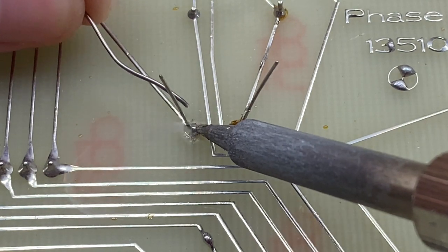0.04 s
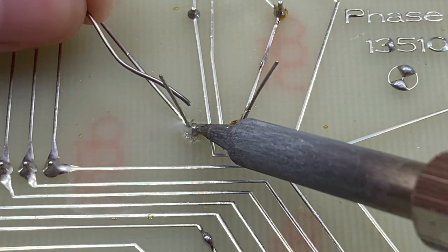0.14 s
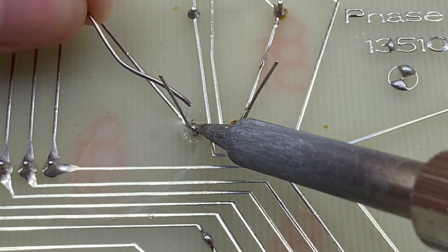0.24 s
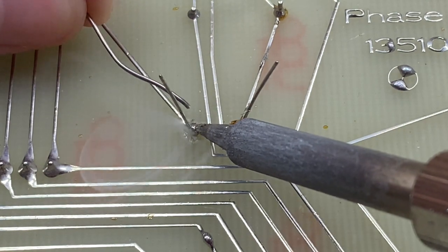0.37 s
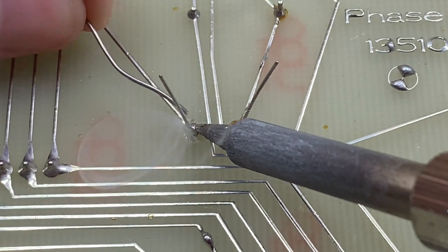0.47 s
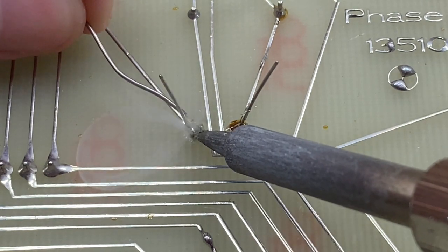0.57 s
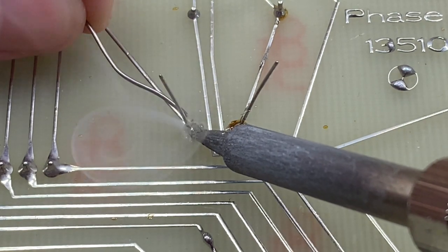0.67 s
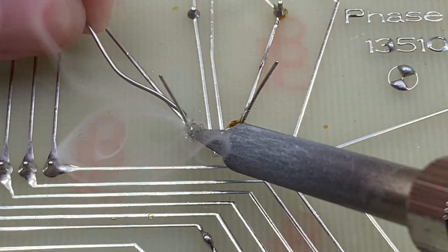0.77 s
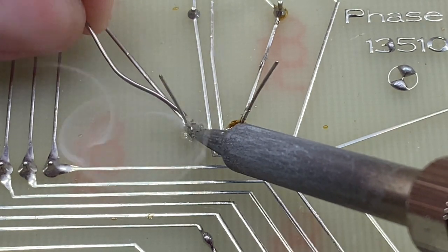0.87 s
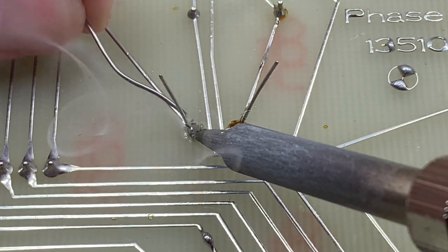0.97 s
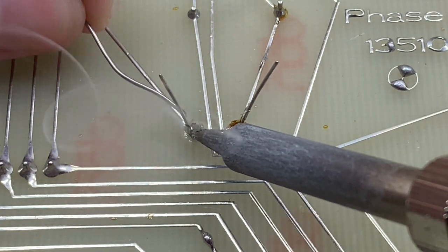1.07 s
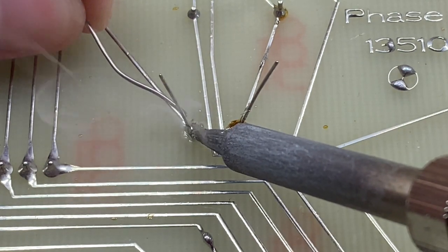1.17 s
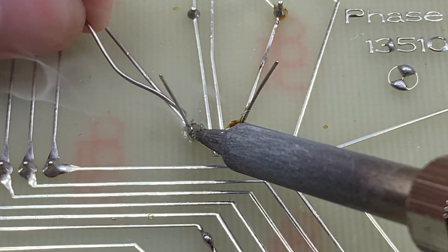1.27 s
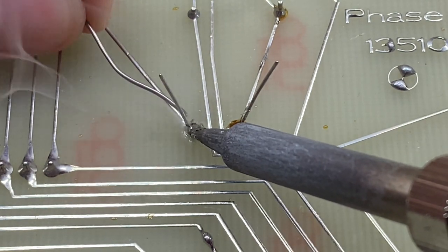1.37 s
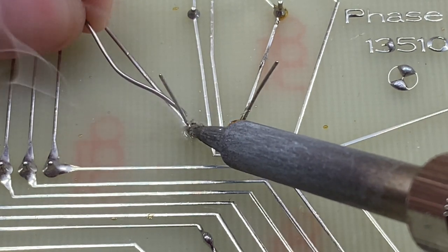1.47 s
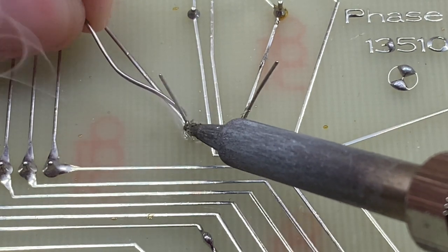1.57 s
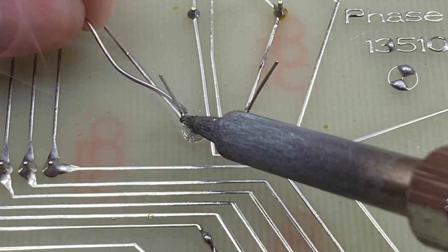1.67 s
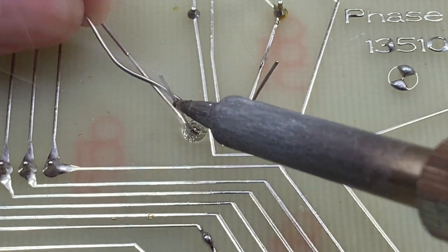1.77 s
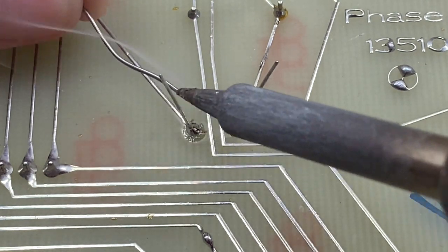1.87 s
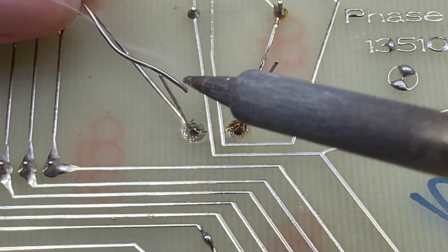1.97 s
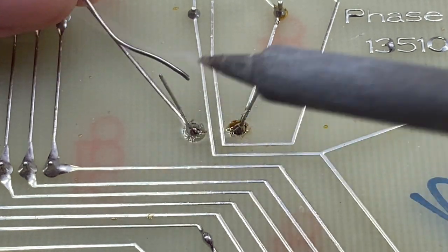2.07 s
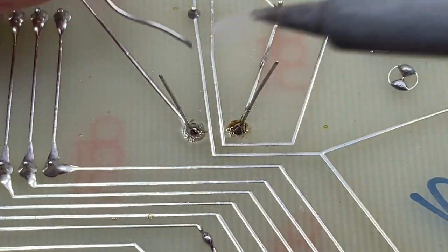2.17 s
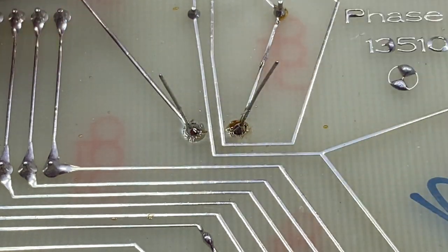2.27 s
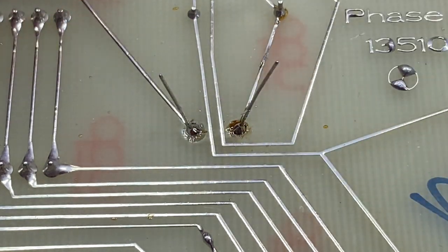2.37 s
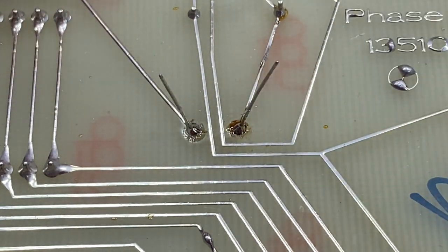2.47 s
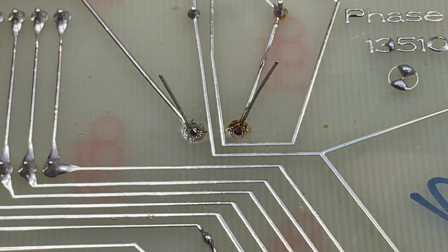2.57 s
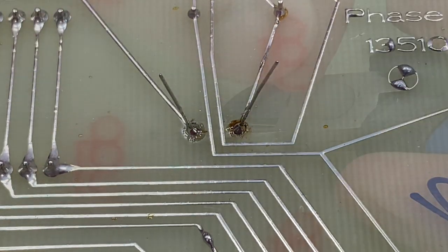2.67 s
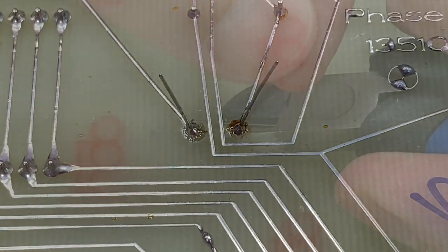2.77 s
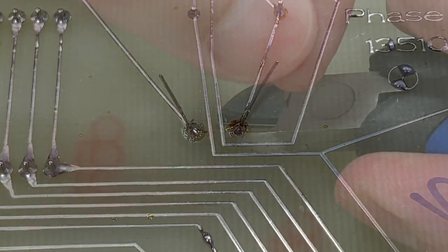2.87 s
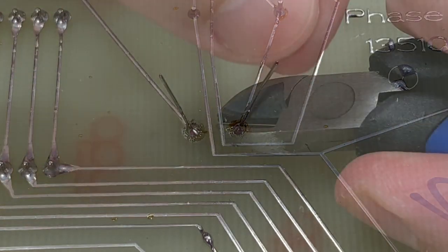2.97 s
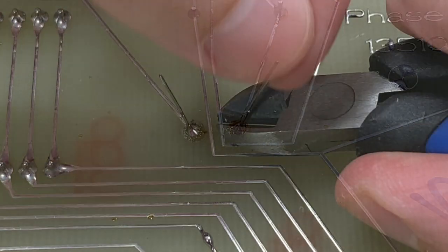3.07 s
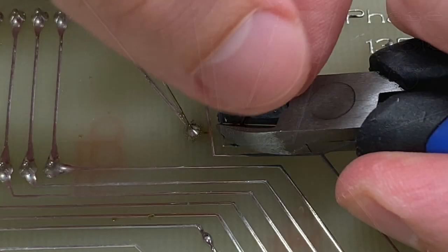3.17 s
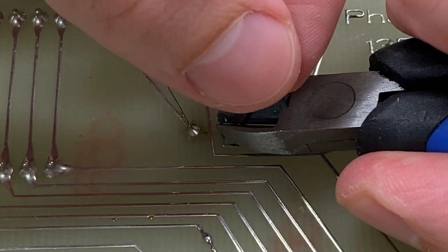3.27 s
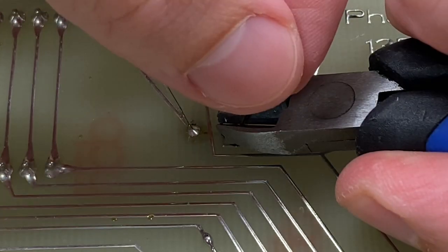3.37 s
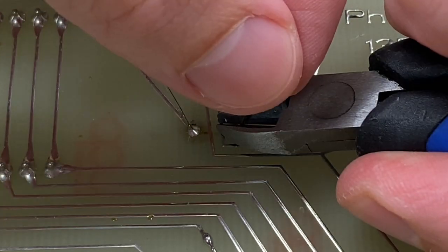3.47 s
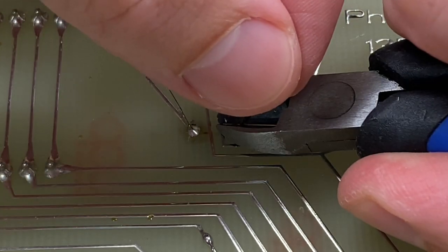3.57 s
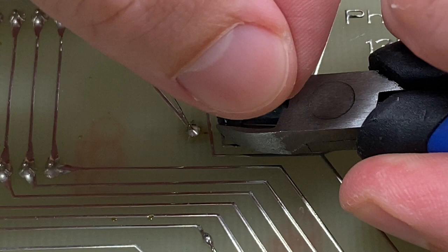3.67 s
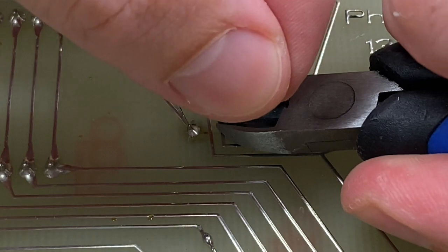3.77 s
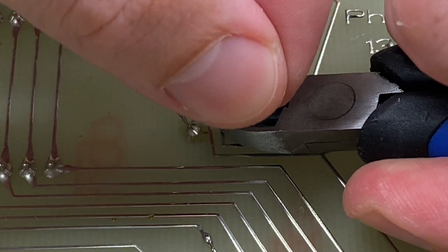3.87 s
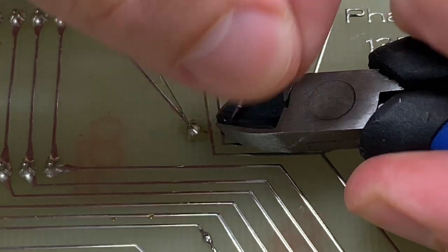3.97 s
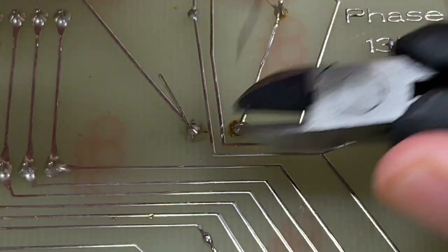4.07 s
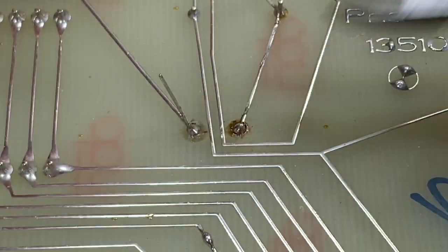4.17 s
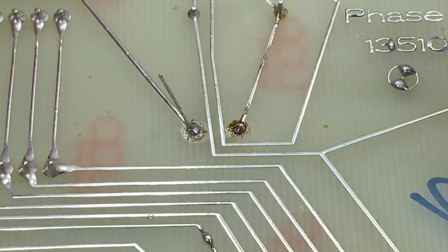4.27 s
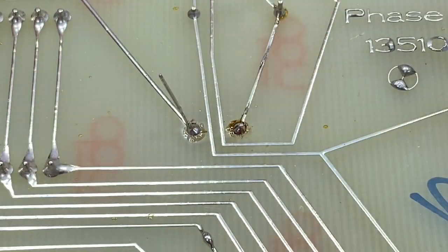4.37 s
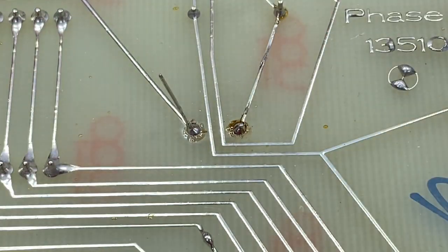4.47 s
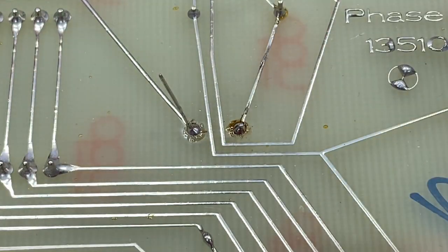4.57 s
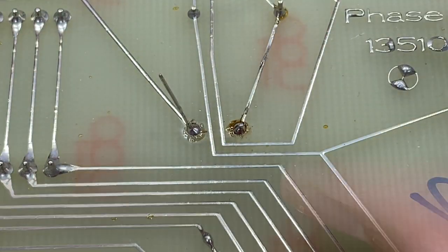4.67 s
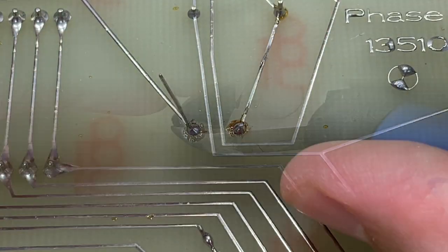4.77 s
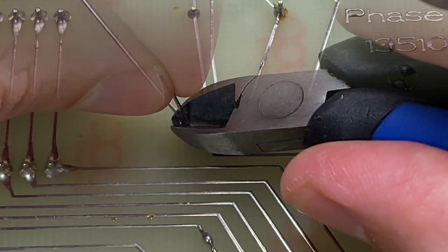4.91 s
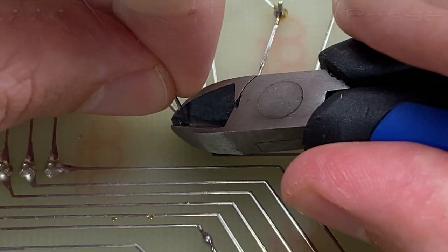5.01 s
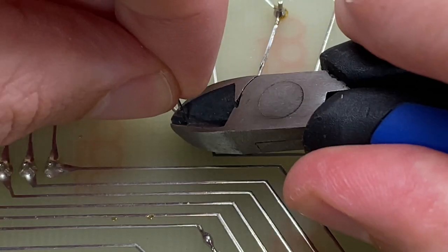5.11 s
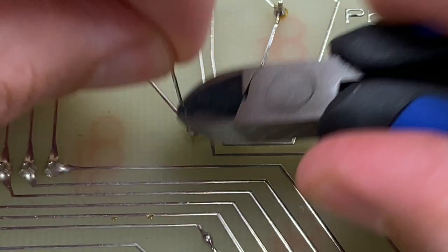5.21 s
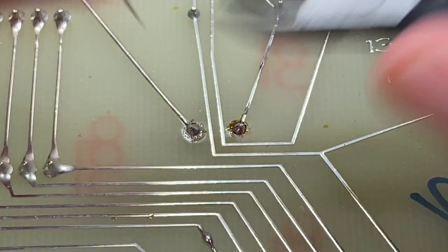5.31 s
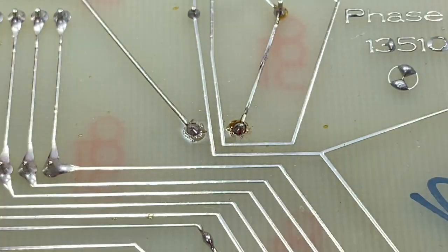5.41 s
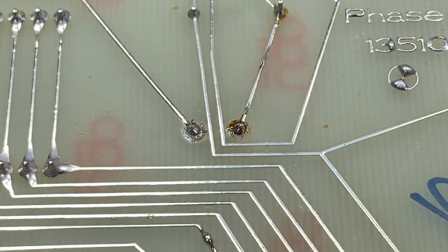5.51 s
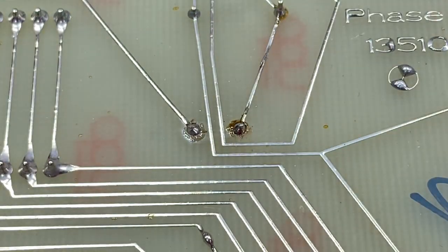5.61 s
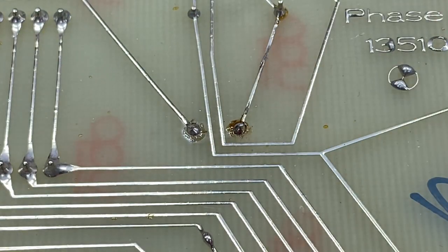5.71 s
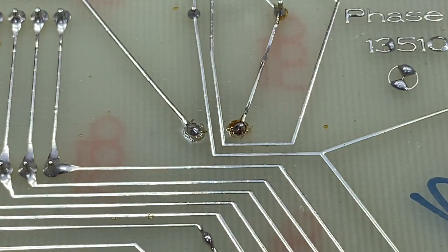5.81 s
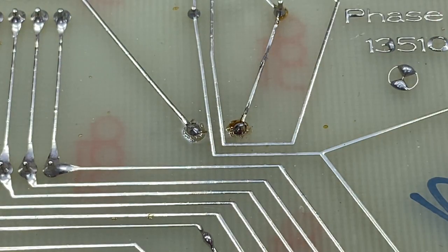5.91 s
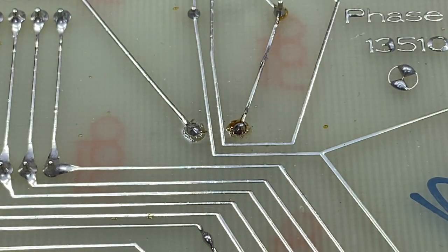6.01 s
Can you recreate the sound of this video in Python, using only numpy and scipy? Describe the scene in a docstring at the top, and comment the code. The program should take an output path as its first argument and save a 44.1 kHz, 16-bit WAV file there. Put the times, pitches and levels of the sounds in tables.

```python
"""Quiet workshop, close to a circuit board: a soldering iron knocks and scrapes, fingers brush, two leads are snipped.
Snips are noise bursts plus decaying sine modes of board, steel jaws and a ringing metal part, with a diving thump.
Knocks are low-passed board modes with a thud and bench shudder; ticks are band noise; the scrape is friction noise
driving board and iron; brushes are swelling noise; low bumps and wobbles are swelling cosines.
Decaying noise makes the small dry room, steady noise the air and hum.
"""
import sys
import numpy as np
from scipy import signal
from scipy.fft import rfft, irfft
from scipy.io import wavfile

SR = 44100
rng = np.random.default_rng(int(sys.argv[2]) if len(sys.argv) > 2 else 0)


def materialize(psi):
    """Save the field psi as 16-bit PCM at rate SR to the path in sys.argv[1].

    A 1-D psi becomes a single channel; in a 2-D psi each row is a channel.
    """
    bounded = np.clip(np.atleast_2d(psi).T, -1, 1)
    quanta = np.round(bounded * 32767).astype(np.int16)
    wavfile.write(sys.argv[1], SR, quanta)


N = 266805
T = np.arange(N) / SR

# cutters snap through a lead: t/s, snap level/dB, crack level/dB, jaws level/dB, board level/dB,
# thump level/dB, thump t60/s, lingering ring level/dB, room send level/dB
WIRE_SNIPS = [(3.8897, 3.5, -9.5, -29, -19.5, -9, 0.037, -42, 8.5),
              (5.1226, 2, -10.5, -43.5, -25, -4.5, 0.2, -43.5, 5.5)]
# colour of the crack, set by where the lead is cut: f/Hz, first cut level/dB, second cut level/dB
CRACK_COLOUR = [(199, -3.5, -0.5), (405, 10, 12.5), (752, 0.5, 6), (1190.4, 11, 6.5), (1980, 0, 2),
                (3040, -2, 3.5), (4230, 0.5, 3.5), (6300, 0.5, -2.5), (8000, 0, 2.5), (10400, -5.5, -2),
                (11314, -11.5, -6.5), (14000, -1, 0), (15000, -10.5, -1.5), (16500, -15.5, -7)]
# board on its holder: f/Hz, level/dB, t60/s
BOARD_MODES = [(153, -15.5, 0.21), (334.8, -6.5, 0.17), (378, -5, .12), (473, -3, .05), (554, -7.5, 0.1),
               (658, -8.5, 0.083), (762, -8, 0.035), (1020, 0, .08), (1110, -6.5, 0.12), (1238, 0, 0.049),
               (1446, -15.5, 0.068), (1590, -12, .07), (1684, -12, 0.038), (1762, -6, .06),
               (2440, -14.5, 0.13), (2630, -14, 0.13)]
# steel jaws, damped by the hand: f/Hz, level/dB, t60/s
JAW_MODES = [(3050, -3, 0.079), (3150, -3, 0.091), (3726, 2.5, 0.07), (3849, -3.5, .06), (3945, 1.5, 0.035),
             (4430, -2.5, 0.061), (4200, -10.5, 0.041), (4880, -7.5, 0.028), (4940, 1, 0.051),
             (6000, -17.5, 0.067), (6670, -5, 0.065), (6860, -16.5, 0.023), (7500, -10.5, 0.027),
             (7200, 1.5, 0.049), (8284, -7.5, 0.024), (11250, -4.5, .06)]
# lightly damped metal part that rings on: f/Hz, level/dB, t60/s
LINGER_MODES = [(1267, 3, 0.64), (623, -4.5, 0.42), (850, -13, 0.6)]
# soft knocks on the board: t/s, level/dB, contact cut-off f/Hz, rebound over knock level/dB
BOARD_KNOCKS = [(0.112, -57, 410, -7), (0.2532, -50, 1100, 13.5), (0.603, -56.5, 445, -1),
                (0.8135, -44.5, 1090, 5), (1.686, -56, 400, -6), (2.664, -46, 350, -8),
                (4.0861, -29.5, 530, -6.5), (5.267, -38.5, 776, 0), (5.758, -60, 2200, -6)]
# small contacts of wire and tool tips: t/s, level/dB, centre f/Hz, t60/s
TIP_TICKS = [(1.576, -70, 3530, 0.056), (1.673, -65, 1300, 0.029), (1.772, -67, 1900, 0.051),
             (1.925, -66, 11500, 0.025), (1.927, -66.5, 2340, 0.046), (4.09, -53, 1800, 0.081),
             (5.268, -52.5, 1620, 0.076), (5.33, -49, 3200, 0.027), (5.338, -45, 2780, 0.017),
             (5.757, -62, 1900, 0.12)]
# tip snags on the solder: t/s, extra level/dB
SOLDER_SNAGS = [(1.579, 5.5), (1.70, 4.5)]
# iron's tip and barrel: f/Hz, level/dB, t60/s
IRON_MODES = [(1604, -3.5, 0.039), (1816, -4, 0.05), (4310, -1.5, 0.011), (4870, -7, 0.006),
              (5800, -12.5, 0.013), (12000, -10.5, 0.0089)]
# colour of the tip's gritty rasp: f/Hz, level/dB
RASP_COLOUR = [(250, -21), (350, 14), (650, 5.5), (1150, -6.5), (1400, -14), (2300, -13.5), (3200, -26),
               (5500, -20.5), (7000, -32), (15000, -48)]
# fingers and grips slide past: peak t/s, level/dB, half length/s, top edge f/Hz
HAND_SLIDES = [(2.307, -63, 0.027, 13000), (2.656, -78.5, 0.058, 3000), (2.985, -73.5, 0.08, 2190),
               (4.165, -71, 0.06, 11000)]
# colour of a slide before its top edge: f/Hz, level/dB
SLIDE_COLOUR = [(300, 2), (1200, -3), (2500, -1.5), (4500, -4.5), (7500, -6), (11000, -9), (16000, -9)]
# light, airy brushes of skin: peak t/s, level/dB
SKIN_BRUSHES = [(2.486, -77.5), (2.75, -80), (4.218, -71), (4.345, -77.5), (4.435, -85), (4.534, -77),
                (4.647, -81), (4.765, -87)]
# faint narrow rubbing: peak t/s, level/dB, half length/s
NARROW_RUBS = [(3.013, -82.5, 0.088), (4.399, -86, 0.24)]
# low bumps and wobbles as the hand moves the board: peak t/s, level/dB, half length/s, f/Hz
LOW_BUMPS = [(2.70, -45.5, 0.015, 150), (4.198, -43, 0.043, 48), (5.293, -33.5, 0.061, 47.5)]
# colour of the room's tail: f/Hz, level/dB
ROOM_COLOUR = [(60, -5.5), (350, 3.5), (1000, 5), (3000, 0), (8000, 4), (15000, -8)]
# relative spectrum of the ventilation: f/Hz, density level/dB
AIR_COLOUR = [(15, -46.5), (25, -13), (53, -1.5), (123, -7), (175, -16), (242, -19), (270, -15.5),
              (344, -21.5), (451, -23.5), (936, -36), (1040, -41), (1700, -41.5), (1940, -46.5),
              (2480, -49.5), (16000, -62)]
# hum and faint fan resonances: f/Hz, level/dB, filter width/Hz
HUM_BANDS = [(75.08, -64, 11), (118.8, -64.5, 2.7), (241.6, -72, 3.5), (735, -77.5, 130), (948, -84.5, 46),
             (1694, -86.5, 140), (2350, -92.5, 460)]

SLAM_S = 0.0007  # jaws slam this long after the snap
# jaws touch the lead before the cut; level is relative to the snap
BITE_LEAD_S, BITE_DB, BITE_HZ, BITE_T60_S = 0.01, -51, 2200, 0.05
TICK_WIDTH_RATIO = 0.43  # width over centre
THUD_DB, THUD_T60_S = 4.5, 0.08  # level relative to the modes of a knock
HELD_T60_S = 0.37  # extra damping by the resting tool
# delay and contact cut-off of the duller second contact, weaker or stronger than the first
REBOUND_S, REBOUND_HZ = 0.00854, 366
NODE_HZ, NODE_WIDTH_HZ = 1032, 124  # knocks land on a nodal line of the modes here
DRAG_START_S, DRAG_LIFT_S = 1.479, 1.775
DRAG_DB, PRESS_DB_PER_S = -63.5, 48.5
DRAG_ATTACK_S, DRAG_RELEASE_S = 0.044, 0.0025
SNAG_HALF_S = 0.011
BRUSH_HALF_S, BRUSH_HZ, BRUSH_WIDTH_HZ = 0.018, 12800, 13000
RUB_HZ, RUB_WIDTH_HZ = 4100, 440


def snips(board, snap_t60_s=0.00083, snap_hz=6000, crack_t60_s=0.056, crack_high_t60_s=0.029,
          rise_s=0.00044, dive_hz=850, settle_hz=5, dive_s=0.0014):
    """The wire parts in a bright snap, the jaws slam shut just after, and everything they touch rings."""
    out = np.zeros(N)
    jaws = ring(JAW_MODES)
    linger = ring(LINGER_MODES)
    hz, *colours = np.transpose(CRACK_COLOUR)
    for snip, colour in zip(WIRE_SNIPS, colours):
        s, snap_db, crack_db, jaws_db, board_db, thump_db, thump_t60_s, linger_db, _ = snip
        snap = passband(rng.standard_normal(SR), snap_hz, "high", order=2) * fade(snap_t60_s)
        crack = dying_noise(list(zip(hz, colour)), 3400, crack_t60_s, crack_high_t60_s)
        crack *= 1 - np.exp(-T[:SR] / rise_s)  # countless small modes fill up as the blow spreads
        modes = undb(jaws_db) * jaws + undb(board_db) * board + undb(linger_db) * linger
        spring_back = undb(thump_db) * thump(dive_hz, settle_hz, dive_s, thump_t60_s)
        add(out, s, undb(snap_db) * snap + undb(crack_db) * crack)
        add(out, s + SLAM_S, modes + spring_back)
    return out


def thump(start_hz, end_hz, sweep_s, t60_s):
    """The board springs back; low bending waves travel slowest, so pitch dives and the wave thins as it spreads."""
    hz = end_hz + (start_hz - end_hz) / (1 + T[:SR] / sweep_s)
    wave = np.sin(2 * np.pi * np.cumsum(hz) / SR)
    return wave * np.sqrt(hz / start_hz) * fade(t60_s)


def knocks(board, dive_hz=640, settle_hz=245, dive_s=0.00588, bench_db=-6.0, bench_hz=370, bench_t60_s=0.24):
    """A thud runs through the board, rebounds and shudders in the bench; softer contacts reach fewer modes."""
    out = np.zeros(N)
    held = (board - band(board, NODE_HZ, NODE_WIDTH_HZ)) * fade(HELD_T60_S)
    blow = held + undb(THUD_DB) * thump(dive_hz, settle_hz, dive_s, THUD_T60_S)
    rebound = passband(held, REBOUND_HZ, "low", order=3)
    bench_envelope = fade(bench_t60_s) * (1 - np.exp(-T[:SR] / 0.0013))
    for s, db, soft_hz, rebound_db in BOARD_KNOCKS:
        shudder = unit(passband(rng.standard_normal(SR), bench_hz, "low", order=4)) * bench_envelope
        softened = passband(blow, soft_hz, "low", order=3)
        add(out, s, undb(db) * (softened + undb(bench_db) * shudder))
        add(out, s + REBOUND_S, undb(db + rebound_db) * rebound)
    return out


def ticks():
    """Small bright contacts, some sounding together with a knock; one more leads each snip."""
    out = np.zeros(N)
    bites = [(s - BITE_LEAD_S, snap_db + BITE_DB, BITE_HZ, BITE_T60_S) for s, snap_db, *_ in WIRE_SNIPS]
    for s, db, hz, t60_s in TIP_TICKS + bites:
        contact = unit(band(rng.standard_normal(SR), hz, TICK_WIDTH_RATIO * hz))
        add(out, s, undb(db) * contact * fade(t60_s))
    return out


def scrape(board, soft_hz=355, soft_width_hz=70, iron_db=-17.5, rasp_db=-7, catch_db=1.0):
    """The tip sticks and slips on the solder: a gritty rasp that shakes both board and iron."""
    catching_db = catch_db * unit(passband(rng.standard_normal(N), 89, "low", order=2))
    force = pressure() * undb(catching_db)
    soft_board = unit(band(board, soft_hz, soft_width_hz))
    response = (soft_board + undb(iron_db) * unit(ring(IRON_MODES))) / np.sqrt(SR)
    shaken = signal.fftconvolve(force * friction(rough_db=1.5), response)[:N]
    return shaken + undb(rasp_db) * force * noise(RASP_COLOUR, size=N)


def pressure():
    """Force of the tip: it sets down, builds steadily in dB, jumps at each snag and drops at lift-off."""
    held_s = np.clip(T, DRAG_START_S, DRAG_LIFT_S)
    before_s = np.maximum(held_s - T, 0)
    after_s = np.maximum(T - held_s, 0)
    contact = np.exp(-before_s / DRAG_ATTACK_S - after_s / DRAG_RELEASE_S)
    snag_db = sum(db * swell(s, 0, SNAG_HALF_S) for s, db in SOLDER_SNAGS)
    return contact * undb(DRAG_DB + PRESS_DB_PER_S * (held_s - DRAG_START_S) + snag_db)


def brushes(slide_rough_db=3.5):
    """Short swells of fine friction: broad slides, airy brushes and narrow rubs."""
    grain = friction(rough_db=3.0)
    roughness = unit(passband(rng.standard_normal(N), 250, "low", order=2))
    skin = noise(SLIDE_COLOUR, size=N) * undb(slide_rough_db * roughness)
    slides = sum(swell(s, db, half_s) * unit(passband(skin, top_hz, "low", order=1))
                 for s, db, half_s, top_hz in HAND_SLIDES)
    airy_level = sum(swell(s, db, BRUSH_HALF_S) for s, db in SKIN_BRUSHES)
    airy = airy_level * narrow(grain, BRUSH_HZ, BRUSH_WIDTH_HZ)
    rubs = sum(swell(*row) for row in NARROW_RUBS) * narrow(grain, RUB_HZ, RUB_WIDTH_HZ)
    return slides + airy + rubs


def low_bumps():
    """Low bumps and wobbles as the hand moves the board; each swells at its own low pitch."""
    return sum(swell(s, db, half_s) * np.cos(2 * np.pi * hz * (T - s)) for s, db, half_s, hz in LOW_BUMPS)


def room(x, wet_db=-16, low_t60_s=0.37, high_t60_s=0.18, split_hz=3500, build_s=0.004):
    """A short diffuse tail that builds up after the direct sound."""
    tail = dying_noise(ROOM_COLOUR, split_hz, low_t60_s, high_t60_s)
    tail *= 1 - np.exp(-(T[:SR] / build_s) ** 2)
    return undb(wet_db) * signal.fftconvolve(x, unit(tail) / np.sqrt(SR))[:N]


def snip_spikes():
    """Summed over all directions, a snip reaches the walls as one even spike."""
    out = np.zeros(N)
    for s, *_, send_db in WIRE_SNIPS:
        out[int(s * SR)] = undb(send_db)
    return out


def workshop(air_db=-56):
    """Steady ventilation rumble as coloured noise, with hum as narrow noise bands."""
    hum = sum(undb(db) * narrow(rng.standard_normal(N), hz, width_hz) for hz, db, width_hz in HUM_BANDS)
    return undb(air_db) * noise(AIR_COLOUR, size=N) + hum


def ring(modes):
    """Response of an object to one blow; successive modes swing against each other."""
    out = np.zeros(SR)
    for k, (hz, db, t60_s) in enumerate(modes):
        out += (-1) ** k * undb(db) * fade(t60_s) * np.sin(2 * np.pi * hz * T[:SR])
    return out


def friction(rough_db):
    """Dense slips of uneven size, rms 1."""
    size = np.minimum(rng.standard_exponential(N), 6)
    return unit(rng.standard_normal(N) * undb(rough_db * size))


def noise(points, size):
    """Noise of rms 1 with a spectrum of (f/Hz, level/dB) points."""
    hz, db = np.transpose(points)
    f = np.maximum(np.fft.rfftfreq(size, 1 / SR), 1)
    gain = undb(np.interp(np.log(f), np.log(hz), db))
    return unit(irfft(rfft(rng.standard_normal(size)) * gain, size))


def dying_noise(points, split_hz, low_t60_s, high_t60_s):
    """One second of coloured noise; bass and treble decay separately."""
    x = noise(points, size=SR)
    low = passband(x, split_hz, "low", order=1)
    return low * fade(low_t60_s) + (x - low) * fade(high_t60_s)


def band(x, hz, width_hz):
    """One resonance, gain 1 at its centre."""
    b, a = signal.iirpeak(hz, hz / width_hz, fs=SR)
    return signal.lfilter(b, a, x)


def narrow(x, hz, width_hz):
    """Two equal resonances in series, scaled to rms 1."""
    return unit(band(band(x, hz, width_hz), hz, width_hz))


def passband(x, hz, kind, order):
    """Butterworth low-pass or high-pass."""
    return signal.sosfilt(signal.butter(order, hz, kind, fs=SR, output="sos"), x)


def swell(s, db, half_s):
    """Gaussian rise and fall around time s; down to 1/e at half_s."""
    return undb(db) * np.exp(-((T - s) / half_s) ** 2)


def fade(t60_s):
    """One second of exponential decay, -60 dB at t60_s."""
    return np.exp(-np.log(1000) * T[:SR] / t60_s)


def undb(db):
    """Decibels to gain."""
    return 10 ** (np.asarray(db) / 20)


def unit(x):
    """Scale to rms 1."""
    return x / np.sqrt(np.mean(x ** 2))


def add(out, s, x):
    """Mix x into out from time s."""
    i = int(s * SR)
    out[i:i + len(x)] += x[:N - i]


def scene(snip_ring_send_db=-15):
    """All the bench work in the room, over its steady background."""
    board = ring(BOARD_MODES)
    cuts = snips(board)
    handling = knocks(board) + ticks() + scrape(board) + brushes()
    echoes = room(handling + snip_spikes() + undb(snip_ring_send_db) * cuts)
    return (cuts + handling + low_bumps() + echoes + workshop())[None]


def record(dry, ceiling=1.1, bass_hz=38, top_hz=15900):
    """The recorder rounds the highest peaks and cuts the deepest bass and the top."""
    rounded = ceiling * np.tanh(dry / ceiling)
    x = passband(rounded, bass_hz, "high", order=4)
    return signal.sosfilt(signal.ellip(8, 0.2, 70, top_hz, fs=SR, output="sos"), x)


dry = scene()
out = record(dry)
materialize(out)
```